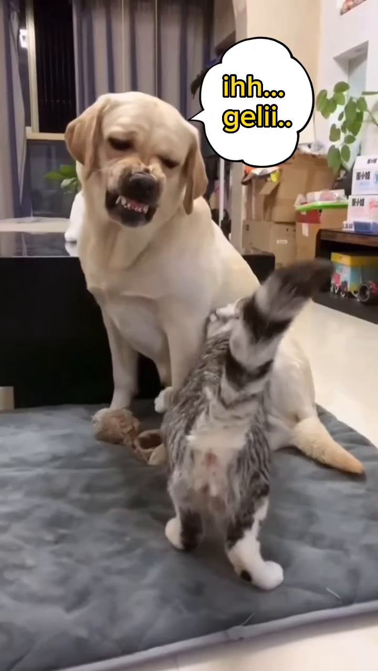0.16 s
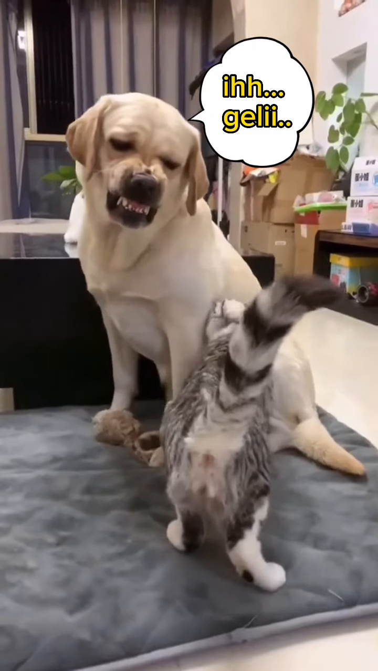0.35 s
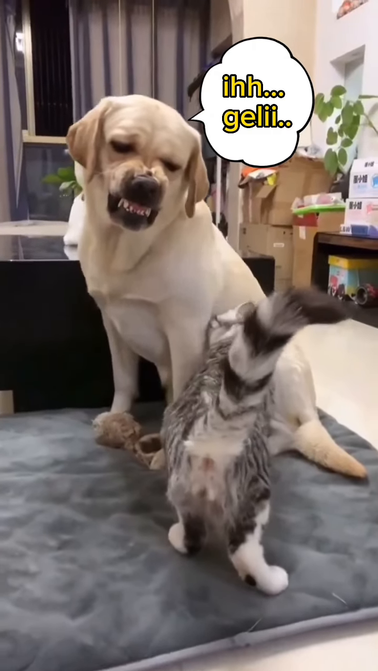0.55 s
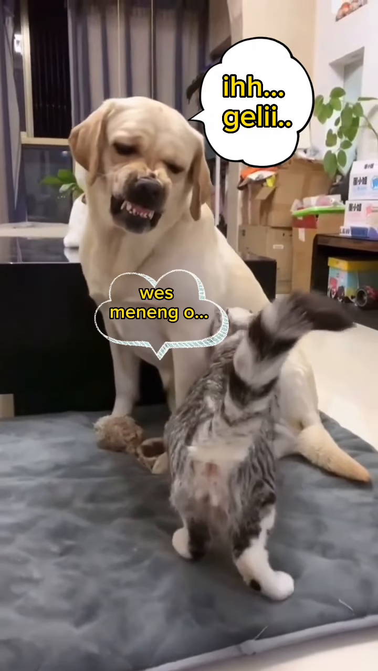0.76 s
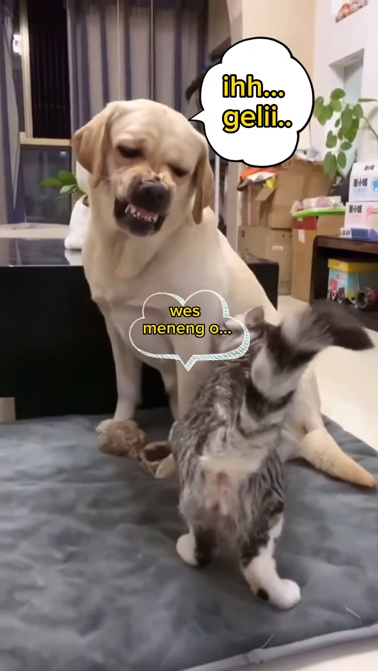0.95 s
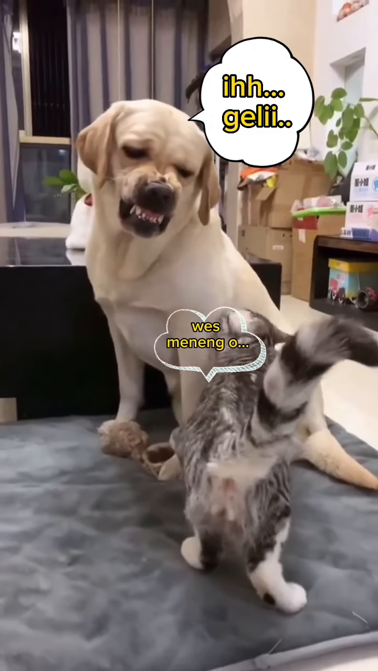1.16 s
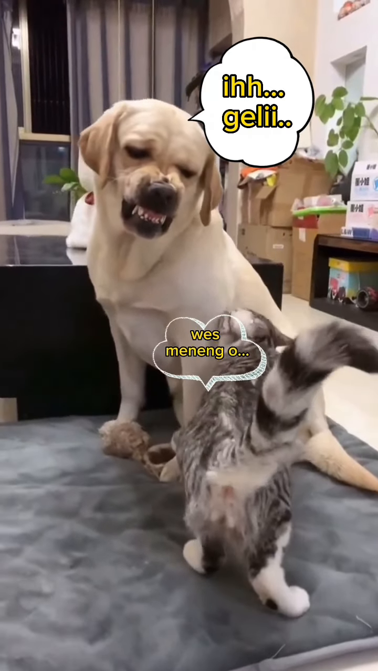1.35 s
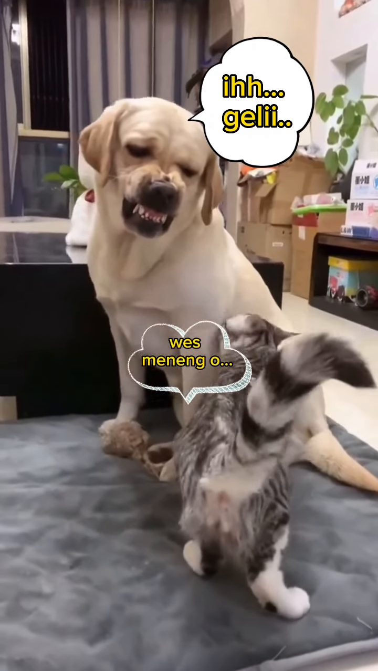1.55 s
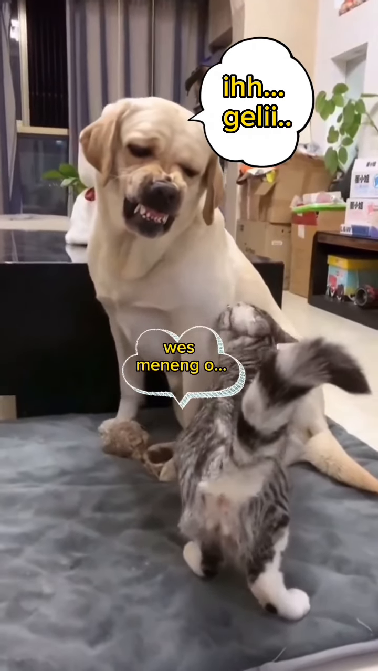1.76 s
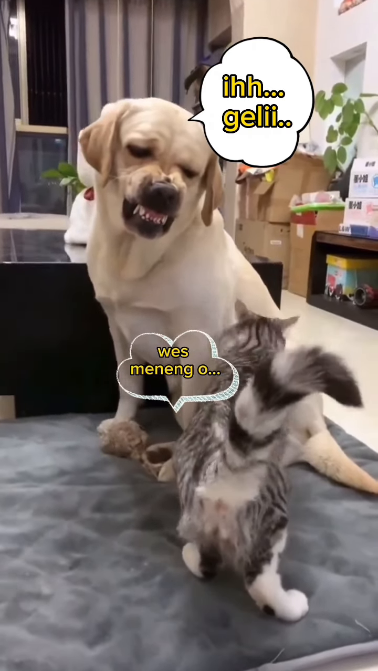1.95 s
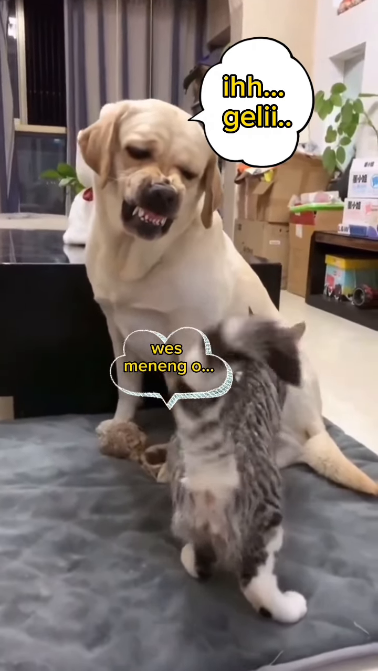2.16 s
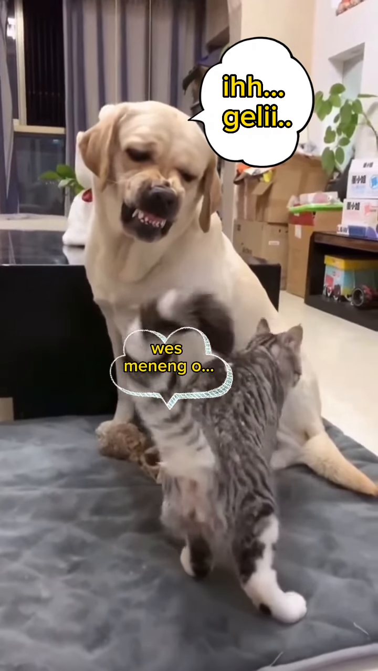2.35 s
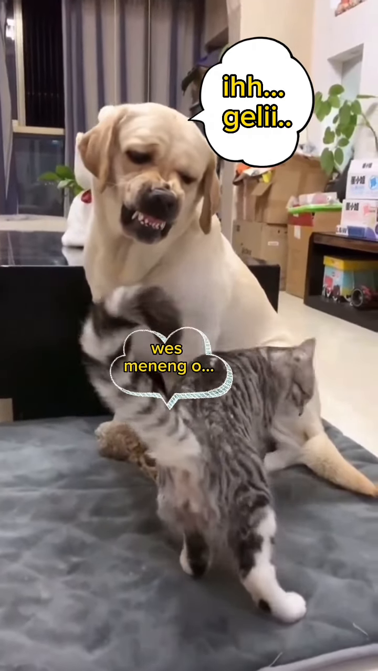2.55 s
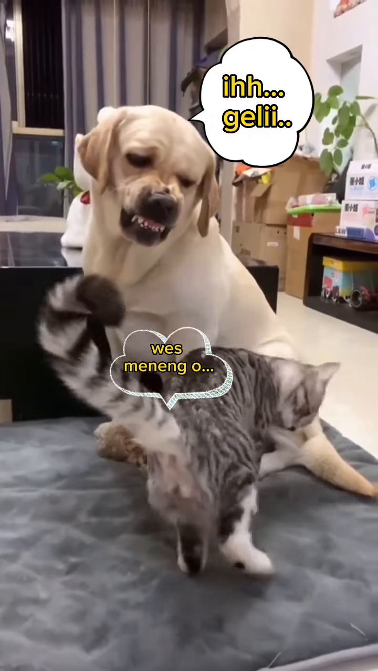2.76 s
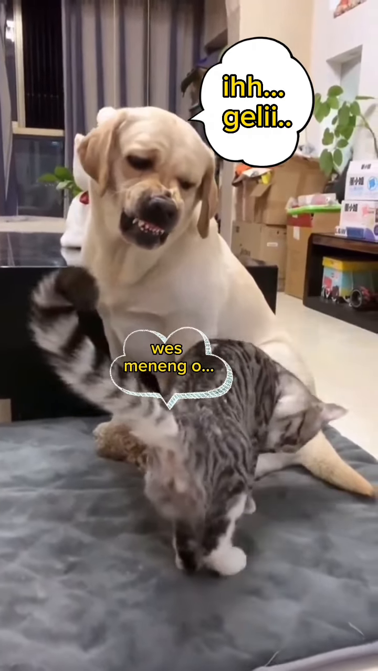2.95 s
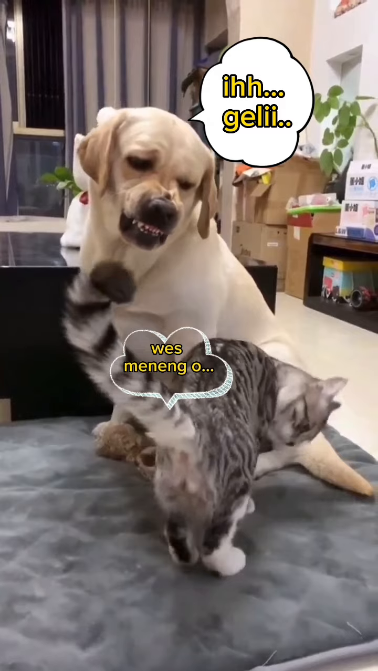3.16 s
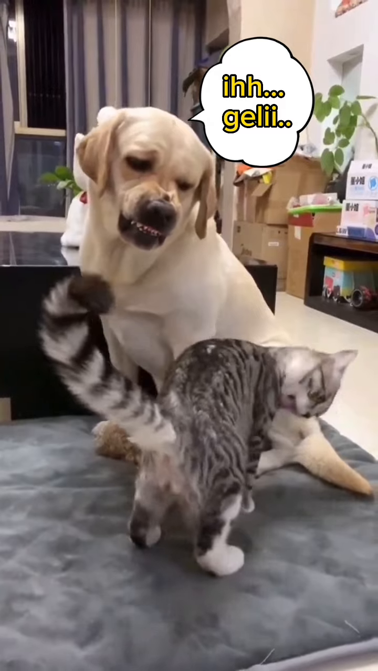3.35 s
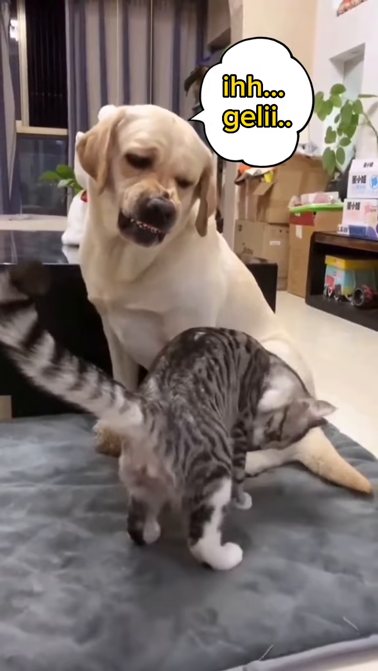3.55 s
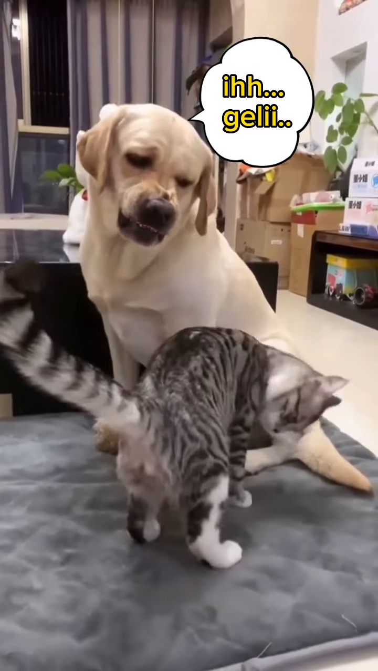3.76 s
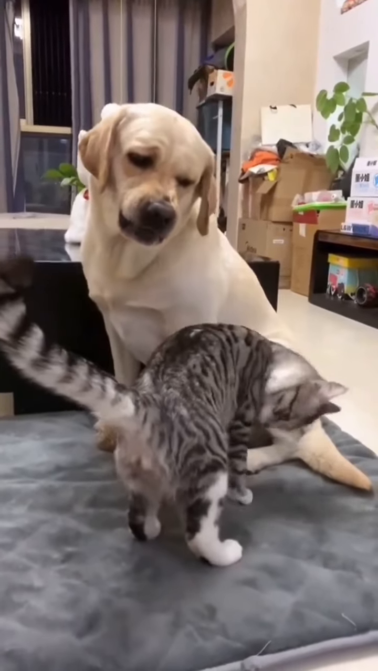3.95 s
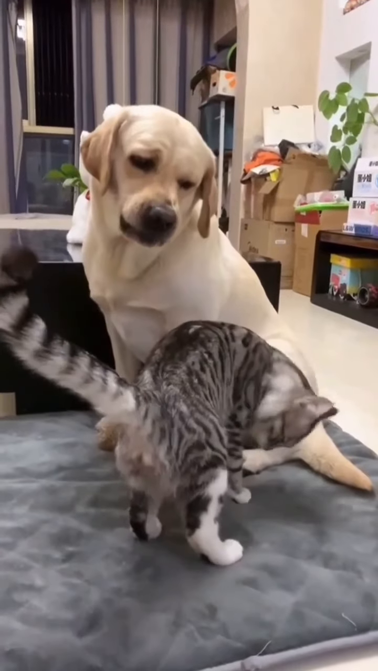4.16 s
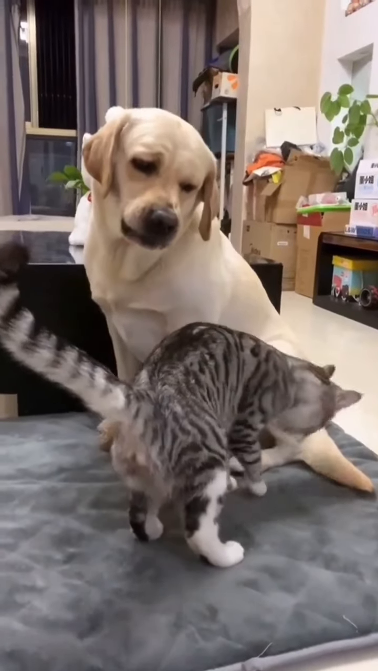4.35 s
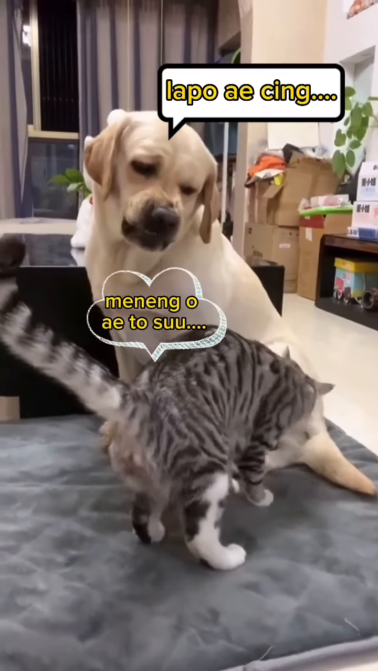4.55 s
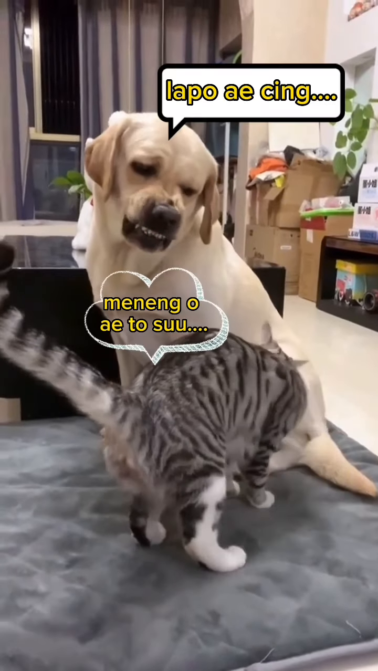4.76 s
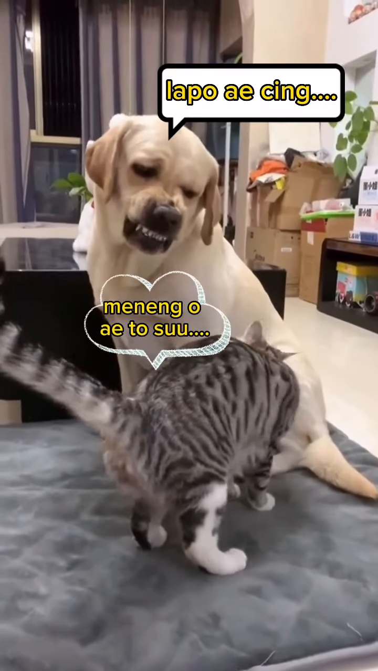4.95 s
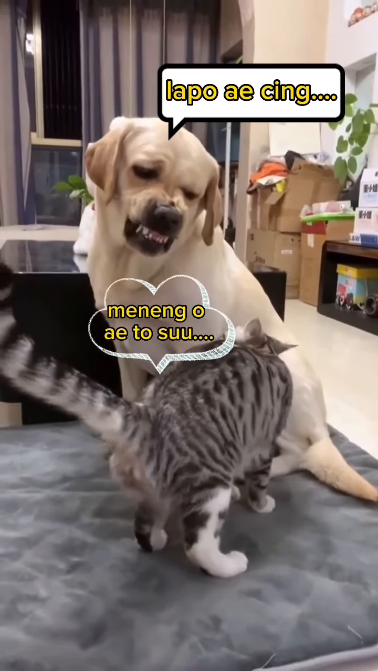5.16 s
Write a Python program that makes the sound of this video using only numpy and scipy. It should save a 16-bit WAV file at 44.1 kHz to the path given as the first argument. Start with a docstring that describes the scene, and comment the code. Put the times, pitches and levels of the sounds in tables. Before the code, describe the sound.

A big dog growls close to the microphone in a furnished room with a short, soft reverberation and quiet, bassy room tone. After a tiny snarl at the start, a long growl runs from 0.1 to 1.7 seconds: rough, fluttering and rattling with sharp throaty cracks, its pitch sinking until it becomes a slow, clean, quieter creak. A brief grunt breaks into a raspy snarl at 1.7, with another near 2.0. A second, smoother growl from 2.2 to 3.4 rises slightly, then sinks into a creak. Snarls burst at 3.5 and 3.75. From 3.9 to 4.5 there is total silence, without even room tone. Sound returns abruptly with a tight, higher grunt gliding down into a loud snarl around 4.6, another grunt and harsh snarl at 4.75 to 5.0, and a final snarl near 5.2, with hard cracks, hissing breath through teeth and thin, wavering overtones.

```python
"""Growling dog in a living room

A big dog growls close by, at a cat that is not heard. Two long growls sink from a rattling rumble to a slow,
clean creak; around them it grunts and snarls through bared teeth, with sharp cracks and thin, high overtones.
Pulses of the vocal folds ring chest, throat and mouth, and loose throat tissue flaps over them.
Room tone lies underneath. The sound drops to silence once for a moment."""
import sys
import numpy as np
from scipy import signal
from scipy.fft import rfft, irfft
from scipy.io import wavfile
from scipy.ndimage import uniform_filter1d

SR = 44100
rng = np.random.default_rng(int(sys.argv[2]) if len(sys.argv) > 2 else 0)


def store_pcm(level_fs):
    """Save levels as 16-bit WAV."""
    pcm = np.round(np.clip(level_fs, -1, 1) * 32767).astype(np.int16)
    wavfile.write(sys.argv[1], SR, np.atleast_2d(pcm).T)


N = 230142
TIME = np.arange(N) / SR  # seconds

# When the two long growls sound. Each row: start in seconds, end in seconds.
GROWLING = [(0.09, 1.67), (2.24, 3.43)]
# How strongly the chest passes each low harmonic. Each row: frequency in Hz, level in dB.
CHEST = [(50, -27), (70, -3.5), (100, 0), (135, 5.5), (175, -5.5), (205, -1.5), (228, -6), (252, -1.5),
         (290, -17), (350, -25.5), (500, -57.5)]
# Throat resonances in snarls, grunts and cracks. Each row: frequency in Hz, width in Hz, level in dB.
SNARL_THROAT = [(447.4, 247, -0.5), (616, 252, 2.5), (805, 86, -1.5), (948, 67, -6.5)]
# Mouth resonances in snarls, grunts and cracks. Each row: frequency in Hz, width in Hz, level in dB.
SNARL_MOUTH = [(1279, 266, 11), (1503, 354, 5.5), (1950, 68, -27), (2238, 82, 6), (2745, 180, -6.5)]
# Colour of the air hissing through the teeth. Each row: frequency in Hz, level in dB.
TEETH = [(1500, -34), (2850, 9), (3150, -4), (3500, 2.5), (4050, -1), (4600, 2.5), (5150, -6.5), (5900, 0),
         (6700, -6), (7950, 1.5), (9500, -7), (11000, -13.5), (13400, -4.5), (15500, -10.5)]


def growl():
    """Folds beat on a sinking pitch; under pressure the false folds flap over them 25 to 36 times a second."""
    # Course of the two growls. Each row: time in seconds, pitch in Hz, chest level in dB before any catch.
    growls = [
        [(0.09, 154.5, -17.5), (0.15, 147.2, -10), (0.226, 140.2, -12.5), (0.3, 148.1, -10.5),
         (0.38, 133, -12.5), (0.442, 129.2, -12), (0.498, 118.2, -11.5), (0.656, 108, -11.5),
         (0.718, 99.64, -14.5), (0.85, 97.5, -13), (0.92, 92.4, -22), (1.102, 86.6, -19), (1.308, 66.5, -24.5),
         (1.374, 70.5, -22), (1.524, 61.9, -27), (1.67, 59.1, -39)],
        [(2.24, 101.9, -27.5), (2.302, 108.8, -12.5), (2.398, 121.4, -13), (2.548, 119.4, -11.5),
         (2.64, 105.4, -14.5), (2.806, 98.85, -16), (2.962, 73.36, -22.5), (2.998, 69.05, -23.5),
         (3.08, 72.6, -19.5), (3.26, 62.9, -26), (3.352, 64.2, -25), (3.43, 58.16, -33)],
    ]
    # Throat resonances of a growl. Each row: frequency in Hz, width in Hz, level in dB.
    growl_throat = [(485.5, 114, -1.5), (579, 105, 0), (716, 142, -7.5), (1032, 63, -8)]
    # Mouth resonances of a growl. Each row: frequency in Hz, width in Hz, level in dB.
    growl_mouth = [(1282, 114, 16), (1706, 120, 6), (1940, 29, -9.5), (2314, 240, 8), (2930, 110, -11.5)]
    # Resonances rung by the opening flap. Each row: frequency in Hz, width in Hz, level in dB.
    flap_ring = [(1290, 90, 0), (2280, 120, -5)]
    hz, breath_db = curves(np.vstack(growls))
    depth, flap_cycles = flapping()
    stumble, chest_dip_db, tract_dip_db = catches()
    creak_db = creak_lift()

    # roughness 0-1: from the folds alone (.33 at full pitch), from flapping and from a catch
    full_hz, full_breath_db = 141.7, -11.5
    rough = np.clip(.33 * hz / full_hz + .28 * depth + .39 * stumble, 0, 1)
    # slow, slack folds close softly, stir little air and leave the upper resonances quiet
    slack_hz, slack_span_hz = 79, 7
    slack = (1 - depth) * np.clip((slack_hz - hz) / slack_span_hz, 0, .9)

    # levels: -23, -36 and -48 dB are those at full breath and full pitch, without flaps, catches or creaks
    chest_db = breath_db - chest_dip_db
    effort_db = breath_db - full_breath_db
    tract_db = opening() - tract_dip_db
    # the throat fades by 13.5 dB for each octave that the pitch sinks
    throat_db = -23 + effort_db + tract_db + 13.5 * np.log2(hz / full_hz) + 3 * depth + creak_db
    # the mouth gains .63 dB for each dB of breath
    mouth_db = -36 + .63 * effort_db + tract_db - 10 * slack + 3.5 * depth + .48 * creak_db
    hiss_db = -48 + effort_db

    cycles = np.cumsum(hz * (1 + 0.037 * rough * walk(120))) / SR
    folds = (1 - depth) * clicks(cycles, 9 * np.minimum(rough, .45))
    # a flap shuts with a dry snap, then opens a third of a cycle later and lets the tract ring
    shut = depth * clicks(flap_cycles, 1.5)
    reopen = depth * clicks(flap_cycles - 1 / 3, 1.5)
    snap = band(shut + .9 * puffs(shut, .005), 700, 2450, order=5)
    flaps = snap + 5 * resonate(reopen + .6 * puffs(reopen, .005), flap_ring)
    pulses = folds + shut + reopen

    # each flap chokes the flow, which puts side bands on the low harmonics
    choke = 1 + 0.32 * depth * np.cos(2 * np.pi * flap_cycles)
    # as the pitch sinks from 108 to 88 Hz, the shaking of the throat walls loses its top
    sunk = np.clip((108 - hz) / 20, 0, 1)
    shaking = rumble()
    shaking = steady((1 - sunk) * shaking + sunk * band(shaking, 60, 190))
    low = steady(chest(cycles, hz) * choke + 1.42 * rough * shaking)

    # rough, taut folds stir turbulence in the throat
    swirl = 3 * (1 - slack) * rough * puffs(pulses, .005)
    throat = steady(band(resonate(pulses + swirl, growl_throat), 130, 1100, order=4))
    ring = resonate(folds + 1.9 * (1 - slack) * puffs(folds, 0.016), growl_mouth)
    dull_ring = band(ring, 300, 1750, order=5)
    mouth = steady((1 - slack) * (ring + flaps) + slack * dull_ring)
    hiss = steady(colour(steady(puffs(pulses, 0.011)) + .5 * noise(), TEETH))
    voice = undb(throat_db) * throat + undb(mouth_db) * mouth + undb(hiss_db) * hiss
    return sounding(GROWLING) * np.array([undb(chest_db) * low, voice])


def flapping(lead=.008, wander=.02):
    """Depth 0-1 of the false folds' beat, and its phase in turns; each bout opens with a flap."""
    # Bouts of flapping, which roughen the voice and drive throat and mouth.
    # Each row: first flap in seconds, end in seconds, flaps per second, depth from 0 to 1.
    bouts = [(0.12, 0.41, 33.4, .9), (0.418, 0.705, 36.2, .9), (0.746, 1.015, 33.2, .96),
             (1.055, 1.25, 34, .94), (2.292, 2.425, 25.5, .85)]
    depths = [full * sounding([(start - lead, end)], fade=.006) for start, end, _, full in bouts]
    cycles = 0
    for start, end, per_s, _ in bouts:
        turns = 1 + per_s * (TIME - start)
        cycles = cycles + np.clip(turns, 0, np.ceil(per_s * (end - start)))
    # the phase wanders a little but never runs backwards
    return np.max(depths, axis=0), np.maximum.accumulate(cycles + wander * walk(30))


def catches():
    """How far the voice is stumbling (0-1), and the dB that chest and tract lose."""
    # Moments where the voice stumbles.
    # Each row: middle in seconds, half width in seconds, chest dip in dB, dip of throat and mouth in dB.
    catch_table = [(0.722, .018, 2, 4), (1.032, .016, 4, 7), (1.295, .035, 3, 5), (1.6, .04, 4, 3),
                   (2.72, .025, 4, 2), (2.87, .02, 6, 0)]
    dips = np.array([np.exp(-((TIME - s) / half_width) ** 2) for s, half_width, *_ in catch_table])
    chest_dip_db, tract_dip_db = np.array(catch_table)[:, 2:].T @ dips
    return dips.sum(axis=0), chest_dip_db, tract_dip_db


def creak_lift():
    """The dB by which each creak lifts the throat: a quick rise, a slow sag, a quick stop."""
    # Creaks at the end of a breath, where the slack folds click shut and ring the tract.
    # Each row: start in seconds, length in seconds, lift in dB before the sag.
    creaks = [(1.338, .21, 12), (2.985, .41, 17)]
    edge_s, sag_db_per_s = .025, 19.5
    lift = 0
    for start, length, db in creaks:
        age = TIME - start
        shape = np.clip(np.minimum(age, length - age) / edge_s, 0, 1)
        lift = lift + shape * (db - sag_db_per_s * age)
    return lift


def opening(missing_db=-17, seconds=0.027):
    """The dB still missing from throat and mouth, as the tract opens a moment after the chest tone begins."""
    return sum(missing_db * np.exp(-((TIME - start) / seconds) ** 2) for start, _ in GROWLING)


def snarl():
    """With lips drawn back the folds beat chaotically, the wet palate flutters and air rasps past the teeth."""
    chest_db, throat_db, mouth_db, hiss_db = snarl_levels()
    # the pitch rises with strength: 144 Hz at 0 dB, 1.55 Hz for each dB, never below 100 Hz
    hz = np.maximum(144 + 1.55 * chest_db, 100)
    cycles = np.cumsum(hz * (1 + .09 * walk(200))) / SR
    flutter = np.cumsum(62 * np.exp(.3 * walk(60))) / SR
    pulses = clicks(cycles, 3.1) + 1.3 * clicks(flutter, 1.2)
    low = steady(chest(cycles, hz) + rumble(), 0.031)
    throat = steady(resonate(pulses + 1.2 * puffs(pulses, 0.0069), SNARL_THROAT), 0.015)
    mouth = steady(resonate(pulses + 2.4 * puffs(pulses, 0.0094), SNARL_MOUTH), 0.099)
    hiss = steady(colour(steady(puffs(pulses, 0.0053)) + 0.64 * noise(), TEETH), 0.079)
    hiss = band(hiss, 1000, 12500)  # drawn-back lips dull the top
    voice = undb(throat_db) * throat + undb(mouth_db) * mouth + undb(hiss_db) * hiss
    return np.array([undb(chest_db) * low, voice])


def snarl_levels(range_db=20):
    """Levels in dB of chest, throat, mouth and hiss: each snarl swells, holds and dies; the strongest rules."""
    # Each row: moment of full strength in seconds, attack, hold and release in seconds,
    # then the full levels of chest, throat, mouth and hiss in dB.
    # Attack and release are the times taken to cross range_db.
    snarls = [(0.012, .08, 0.034, 0.039, -15.5, -27.5, -31, -41.5),
              (1.718, .01, 0.037, 0.15, -13, -23, -25.5, -36.5),
              (1.985, 0.17, 0.034, .11, -13.5, -24.5, -29, -37),
              (2.145, 0.11, 0.031, 0.041, -18, -32.5, -34.5, -44),
              (3.481, 0.078, 0.018, .03, -21, -37.5, -52.5, -52.5),
              (3.507, .015, 0.056, 0.13, -14, -24, -26.5, -39), (3.734, .09, .1, .17, -15, -27, -30, -39.5),
              (4.601, 0.088, .062, .09, -8.5, -19.5, -24.5, -34.5),
              (4.857, .015, .125, .17, -7, -21.5, -26, -34), (5.03, 0.049, .125, .1, -13, -28, -28.5, -38),
              (5.188, 0.079, .04, 0.095, -7.5, -20.5, -23, -32)]
    swell = np.array([.75, 1, 1, 0.79])  # chest tone and hiss swell by less than throat and mouth
    levels = []
    for s, attack, hold, release, *full_db in snarls:
        away = np.maximum((s - TIME) / attack, (TIME - s - hold) / release)
        fade_db = -range_db * np.maximum(away, 0)
        levels.append(np.array(full_db)[:, None] + np.outer(swell, fade_db))
    return np.max(levels, axis=0)


def grunt():
    """Tight, high folds give a cleaner note that swells and glides down until the snarl breaks it up."""
    # Each row: start in seconds, length in seconds, first pitch in Hz, last pitch in Hz, full chest level in dB.
    grunts = [(1.68, 0.051, 260, 198, -15.5), (4.497, 0.028, 279.5, 270.4, -19.5),
              (4.528, .075, 257.4, 227.9, -6.5), (4.755, 0.086, 244, 173.3, -11.5)]
    peak_share, range_db = .6, 17  # part of the length spent swelling, and the dB gained by then
    jitter, rough, undertone = .025, .3, .35  # pitch jitter, amount of turbulence, amount of half-pitch tone
    hz, gain = np.full(N, float(grunts[0][2])), np.zeros(N)
    for start, length, first_hz, last_hz, db in grunts:
        progress = (TIME - start) / length
        hz = np.where(progress >= 0, np.interp(progress, [0, 1], [first_hz, last_hz]), hz)
        swell_db = range_db * np.minimum(progress / peak_share - 1, 0)
        gain = gain + undb(db + swell_db) * sounding([(start, start + length)], fade=0.0049)
    cycles = np.cumsum(hz * (1 + jitter * walk(200))) / SR
    pulses = clicks(cycles, 2.5)
    drive = pulses + rough * puffs(pulses, 0.0057)
    low = steady(chest(cycles, hz) + undertone * chest(cycles / 2, hz / 2) + rough * rumble())
    throat = steady(resonate(drive, SNARL_THROAT))
    mouth = steady(resonate(drive, SNARL_MOUTH))
    hiss = steady(colour(noise(), TEETH))
    # levels relative to the chest tone
    voice = undb(-22.5) * throat + undb(-26.5) * mouth + undb(-30) * hiss
    return gain * np.array([low, voice])


def cracks(count=2048):
    """Sharp cracks in the throat, from hard flaps, snarl onsets and a creak's start, ring the whole tract."""
    # Each row: start in seconds, peak level in dB.
    crack_table = [(0.042, -17), (0.119, -10.5), (0.217, -11), (0.244, -9), (0.385, -8.5), (0.418, -13),
                   (0.745, -17), (1.348, -23), (1.717, -18), (1.732, -7.5), (1.984, -12.5), (2.004, -7),
                   (2.292, -10), (2.336, -11), (2.371, -15), (2.407, -18), (3.506, -8), (3.563, -9.5),
                   (3.731, -14), (3.825, -10.5), (3.851, -19), (4.641, -3), (4.662, -5), (4.881, -8.5)]
    out = np.zeros(N + count)
    for s, db in crack_table:
        # a click with a very short burst of noise
        burst = 0.16 * rng.standard_normal(count) * np.exp(-np.arange(count) / SR / 0.0012)
        burst[0] += 1
        throat = resonate(burst, SNARL_THROAT)
        mouth = resonate(burst, SNARL_MOUTH)
        ring = throat + undb(-18.5) * mouth + undb(-41.0) * band(burst, 2500, 9000)
        start = int(s * SR)
        out[start:start + count] += undb(db) * ring / np.abs(ring).max()
    return out[:N]


def overtones(waver=0.0121):
    """High overtones of the dog's voice: thin, wavering tones that glide briefly above grunts and snarls."""
    # Each row: start in seconds, length in seconds, first pitch in Hz, last pitch in Hz, peak level in dB.
    overtone_table = [(0.008, 0.03, 1320, 1290, -31), (4.524, 0.073, 1010, 990, -29),
                      (4.53, 0.092, 2960, 2850, -41), (4.774, 0.072, 1040, 918.5, -29),
                      (4.776, 0.029, 1240, 1113, -27.5), (4.927, 0.04, 1260, 1170, -22.5),
                      (5.178, 0.05, 1360, 1305, -19.5)]
    out, wobble = 0, 1 + waver * walk(197)
    for s, length, first_hz, last_hz, db in overtone_table:
        progress = np.clip((TIME - s) / length, 0, 1)
        cycles = np.cumsum((first_hz + (last_hz - first_hz) * progress) * wobble) / SR
        out = out + undb(db) * np.sin(np.pi * progress) * np.sin(2 * np.pi * cycles)
    return out


def room(x, near_db=-4, near_t60=0.03):
    """Nearby hard surfaces scatter the treble; the furnished room adds a short tail."""
    near = band(reflections(x, near_t60), 3200, 20000, order=4)
    tail = undb(-16) * reflections(x, .28)
    return x + undb(near_db) * near + tail


def reflections(x, t60):
    """A dense train of echoes that dies by 60 dB in t60 seconds, with the power of the direct sound."""
    tail = noise() * np.exp(-np.log(1000) * TIME / t60)
    return signal.fftconvolve(x, tail / np.linalg.norm(tail))[:N]


def room_tone():
    """The quiet, steady background: noise that is strongest in the bass."""
    # Colour of the background. Each row: frequency in Hz, level in dB.
    tone_colour = [(30, -6), (60, -9), (130, -11.5), (400, -19.5), (1500, -23.5), (4000, -45.5),
                   (15000, -48.5)]
    return undb(-46.0) * steady(colour(noise(), tone_colour))


def chest(cycles, hz, count=6):
    """The lowest harmonics of the folds, radiated by chest and neck."""
    return steady(sum(gain_at(CHEST, k * hz) * np.cos(2 * np.pi * k * cycles) for k in range(1, count + 1)))


def rumble():
    """Chaotic shaking of the throat walls, in the same low resonances as the chest tone."""
    high_pass = signal.butter(4, 75, "high", fs=SR, output="sos")
    return steady(signal.sosfilt(high_pass, colour(noise(), CHEST)))


def clicks(cycles, scatter_db):
    """One click at each whole turn of a phase, each of its own strength."""
    return np.diff(np.floor(cycles), prepend=0) * undb(scatter_db * np.clip(noise(), -2, 2))


def puffs(pulses, seconds):
    """A dying puff of turbulent air after each pulse, with the energy of that pulse."""
    keep = np.exp(-2 / (seconds * SR))
    power = signal.lfilter([1 - keep], [1, -keep], pulses ** 2 + 1e-18)
    return noise() * np.sqrt(power)


def resonate(x, modes):
    """Parallel resonances, with steep skirts below the lowest and above the highest."""
    y = 0
    for k, (hz, width, db) in enumerate(modes):
        ring = signal.lfilter(*signal.iirpeak(hz, hz / width, fs=SR), x)
        y = y + (-1) ** k * undb(db) * ring  # neighbours alternate in sign
    edges = [0.58 * modes[0][0], 0.97 * modes[-1][0]]
    return signal.sosfilt(signal.butter(2, edges, "band", fs=SR, output="sos"), y)


def band(x, low_hz, high_hz, order=2):
    """Band-pass filter."""
    edges = [low_hz, min(high_hz, .45 * SR)]
    return signal.sosfilt(signal.butter(order, edges, "band", fs=SR, output="sos"), x)


def gain_at(points, hz):
    """Gain of a (Hz, dB) spectrum at given frequencies."""
    f, db = np.transpose(points)
    return undb(np.interp(np.log(np.maximum(hz, 1)), np.log(f), db))


def colour(x, points):
    """Filter by a (Hz, dB) spectrum."""
    return irfft(rfft(x) * gain_at(points, np.fft.rfftfreq(N, 1 / SR)), N)


def steady(x, seconds=0.044):
    """The same sound with its running power held near 1."""
    k = int(seconds * SR)
    power = uniform_filter1d(uniform_filter1d(x * x, k), k)
    return x / np.sqrt(np.abs(power) + 1e-12)


def sounding(spans, fade=0.0034):
    """1 inside the spans, with short fades."""
    on = sum((TIME >= start) & (TIME < end) for start, end in spans)
    return uniform_filter1d(on.astype(float), int(fade * SR))


def curves(table):
    """The columns of a table, joined by straight lines in time."""
    s, *columns = np.transpose(table)
    return [np.interp(TIME, s, c) for c in columns]


def walk(rate):
    """Smooth random wandering of spread 1 that turns about rate times a second."""
    k = max(int(SR / rate), 1)
    y = uniform_filter1d(uniform_filter1d(noise(), k), k)
    return y / y.std()


def noise():
    """White noise."""
    return rng.standard_normal(N)


def undb(db):
    """Decibels to gain."""
    return 10 ** (np.asarray(db) / 20)


def scene():
    """The dog's low rumble comes straight; its open mouth also sounds the room."""
    low, voice = growl() + snarl() + grunt()
    direct = band(low + room_tone(), 56, 16190, order=3)
    return (direct + room(voice + cracks() + overtones()))[None]


def record(dry):
    """The loudest peaks clip, the sound drops to silence for the pause, and the top is cut."""
    # The silent pause: start in seconds, end in seconds.
    pause = (3.9, 4.5)
    live = uniform_filter1d(1. * ((TIME < pause[0]) | (TIME > pause[1])), size=64)
    top_cut = signal.ellip(10, .2, 80, 15600, fs=SR, output="sos")  # steep low-pass at 15600 Hz
    return signal.sosfilt(top_cut, np.clip(dry, -1, 1) * live)


dry = scene()
out = record(dry)
store_pcm(out)
```